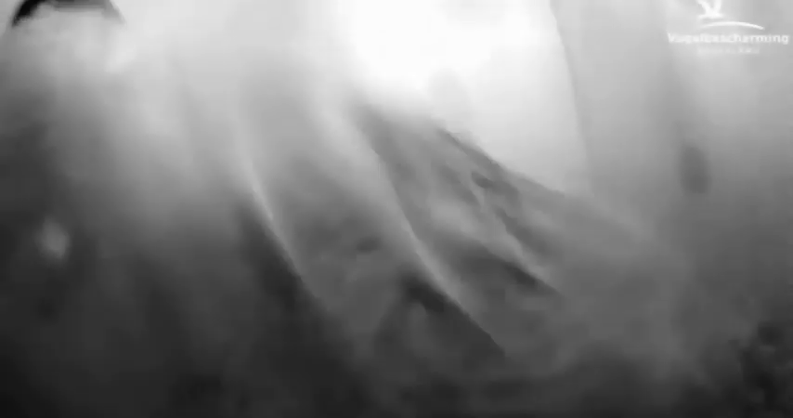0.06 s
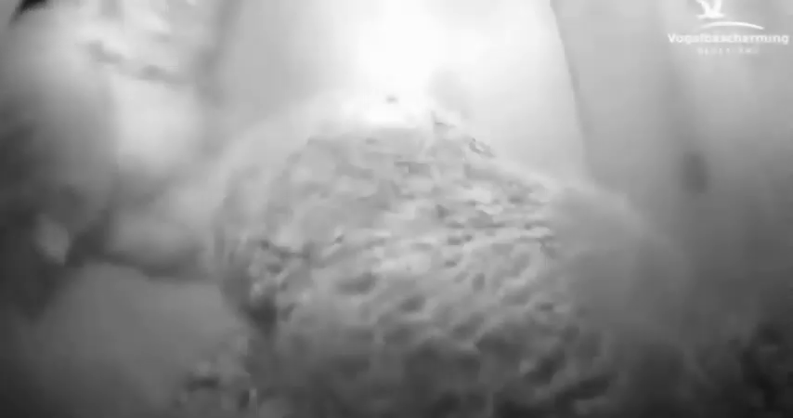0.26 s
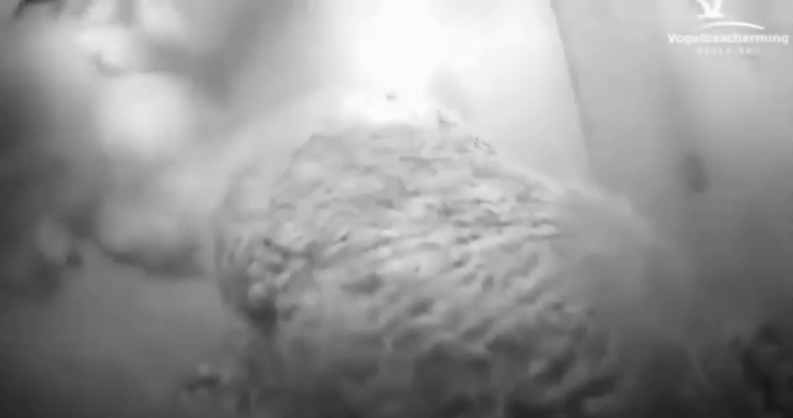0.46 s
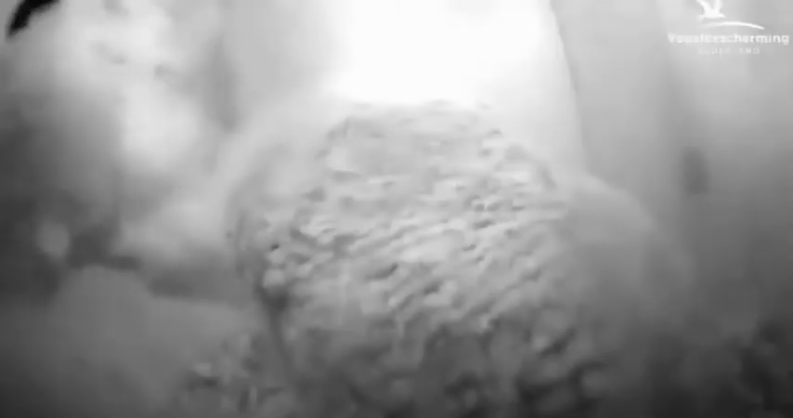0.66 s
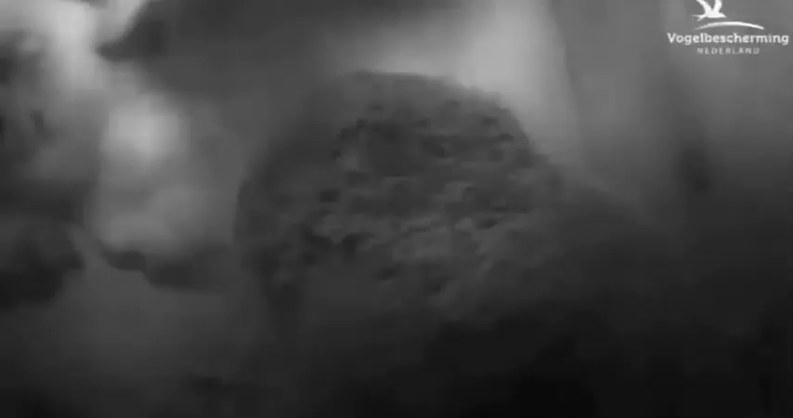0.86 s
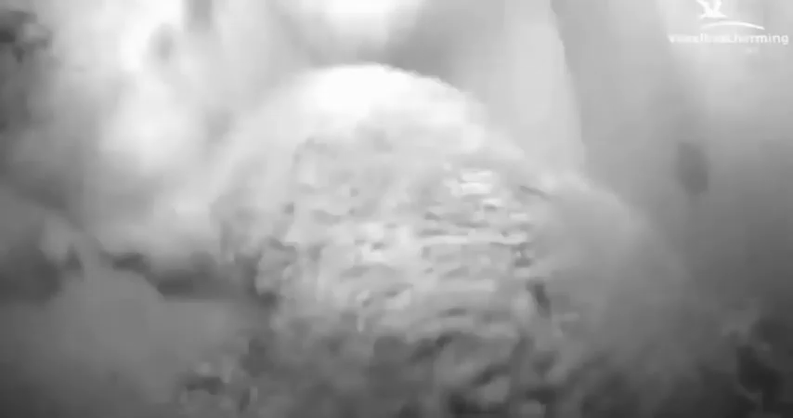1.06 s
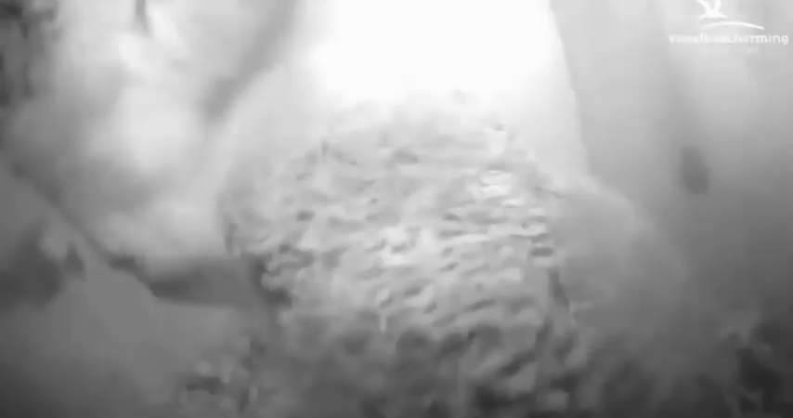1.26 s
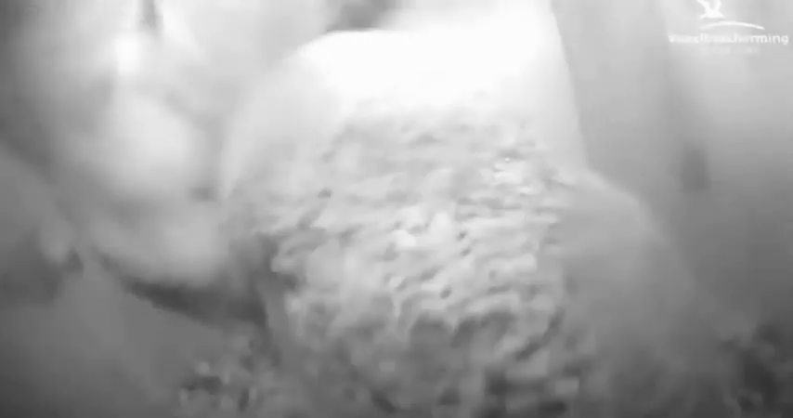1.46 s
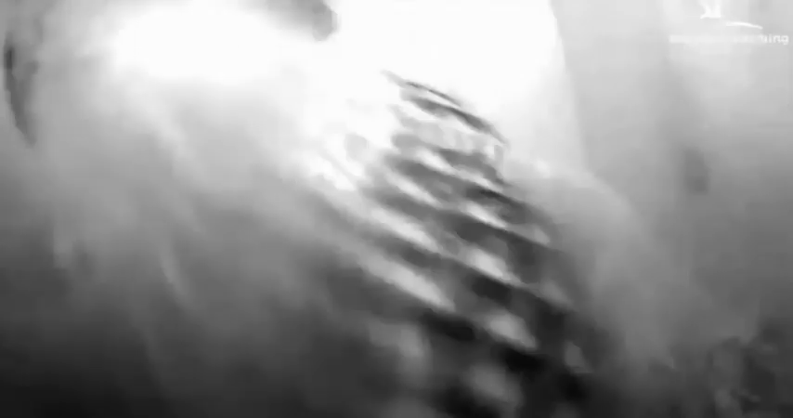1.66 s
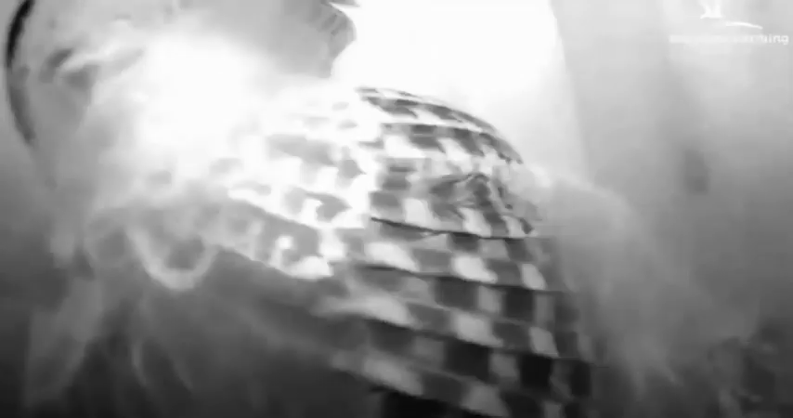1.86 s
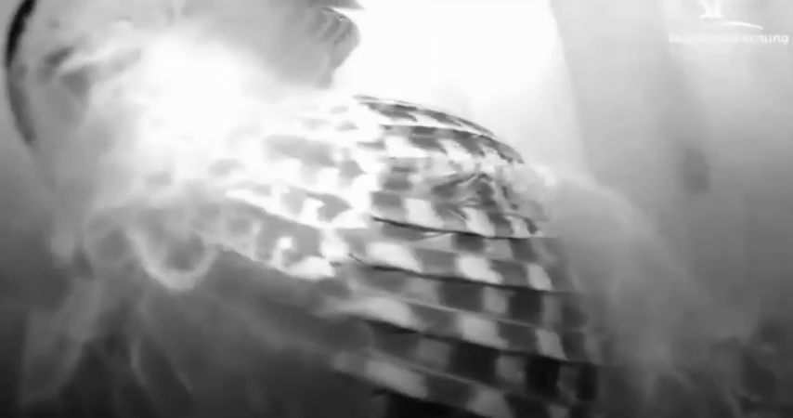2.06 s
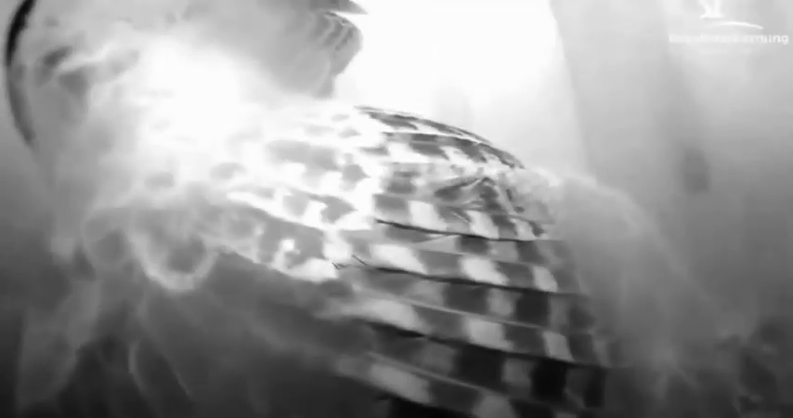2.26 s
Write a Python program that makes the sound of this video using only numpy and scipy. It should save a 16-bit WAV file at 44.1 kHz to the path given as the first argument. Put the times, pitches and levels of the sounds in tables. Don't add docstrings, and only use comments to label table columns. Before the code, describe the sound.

Very close, dull narrow-band microphone inside a small wooden box; a bird's body drags and slips against the wall twice with overloading thumps, panels rattling, feathers brushing and claws ticking, then only faint bumps over low hum.

```python
import sys
import numpy as np
from scipy import signal
from scipy.io import wavfile

SR = 44100
rng = np.random.default_rng(int(sys.argv[2]) if len(sys.argv) > 2 else 0)


def volts_from_db(level):
    exponent = np.asarray(level, float) / 20
    return 10 ** exponent


def unload_wav(signal):
    wavfile.write(
        sys.argv[1],
        SR,
        np.round(np.clip(np.atleast_2d(signal).T, -1, 1) * 32767).astype(np.int16),
    )


N = 101429


def rms_one(x):
    return x / np.sqrt(np.mean(x ** 2) + 1e-20)


def in_time(rows):
    seconds, *columns = np.transpose(rows)
    return [np.interp(np.arange(N) / SR, seconds, column) for column in columns]


def drift(rate):
    r = np.exp(-80 * np.pi * rate / SR)
    slow = signal.lfilter([1], [1, -2 * r, r * r], rng.standard_normal(N // 40 + 2002))[2000:]
    slow = rms_one(slow - slow.mean())
    return np.interp(np.arange(N) / 40, np.arange(len(slow)), slow)


def band(x, low_hz, high_hz):
    return signal.sosfilt(signal.butter(2, [low_hz, high_hz], "band", fs=SR, output="sos"), x)


def grains(per_s, spread_db):
    sizes = volts_from_db(spread_db * np.minimum(rng.exponential(1, N), 5)) * rng.choice([-1, 1], N)
    return sizes * (rng.random(N) < per_s / SR) + 1e-18


def above_floor(db, floor_db):
    return np.sqrt(np.maximum(volts_from_db(db) ** 2 - volts_from_db(floor_db) ** 2, 0))


# frequency in Hz, level in dB rms.
HUM_LINES = [(49.7, -61), (149.2, -76), (248.6, -89), (448, -92), (547, -92)]


def hum():
    t = np.arange(N) / SR
    out = np.zeros(N)
    for hz, db in HUM_LINES:
        level = np.sqrt(2) * volts_from_db(db + 0.9 * drift(2.4))
        out += level * np.sin(2 * np.pi * (hz * t + rng.random()))
    return out


# frequency in Hz, density in dB per Hz.
HISS_COLOUR = [(32, 19), (64, 15), (110, 5), (320, 3), (640, -4.5), (1100, -12), (2200, -9), (3600, -5)]
HISS_DB, HISS_FLICKER_DB, HISS_TOP_LOSS_DB = -76, 1.17, 6


def hiss():
    out = np.zeros(N)
    edges = 25 * 2 ** np.arange(0, 7.8, 1 / 3)
    white = rng.standard_normal((2, N))
    hz, db = np.transpose(HISS_COLOUR)
    for k, (low, high) in enumerate(zip(edges, edges[1:])):
        level_db = np.interp(np.log(low * high) / 2, np.log(hz), db)
        level_db = level_db - HISS_TOP_LOSS_DB * (low > 4000)
        out += volts_from_db(level_db + HISS_FLICKER_DB * drift(8)) * band(white[k % 2], low, high)
    return volts_from_db(HISS_DB) * rms_one(out)


# time in seconds, level in dB.
SWAY_LEVEL = [(0, -44.5), (.05, -56), (.15, -53.5), (.19, -46), (.23, -33.5), (.3, -36), (.38, -39),
              (.48, -56), (.58, -50), (.76, -46), (.82, -42), (.88, -52.5), (1.05, -55.5), (1.2, -64)]


def sway():
    level_db = in_time(SWAY_LEVEL)[0]
    return above_floor(level_db, -60) * rms_one(band(rng.standard_normal(N), 22, 62))


# start in seconds, level in dB, centre in Hz, width in Hz, rise in seconds.
WHEEZE_SHAPE = (2.07, -85, 3560, 260, .04)


def wheeze():
    start, db, hz, width_hz, rise = WHEEZE_SHAPE
    swell = np.clip((np.arange(N) / SR - start) / rise, 0, 1)
    air = band(rng.standard_normal(N), hz - width_hz / 2, hz + width_hz / 2)
    return volts_from_db(db + 2.5 * drift(10)) * swell * rms_one(air)


# time in seconds, bright level in dB, dull share in dB over bright.
BRUSH_LEVEL = [(0, -65, 10), (.04, -67, -4), (.06, -78, -3), (.24, -63, 1.5), (.3, -76.5, -3.5),
               (.66, -77, -0.5), (.7, -80, 13), (.725, -60.5, 5.5), (.765, -60, 3.5), (.782, -59, -14),
               (.83, -59, 3.5), (.9, -74.5, -2.5), (.93, -71, 5.5), (1.04, -72, 3.5), (1.08, -77.5, -1.5),
               (1.57, -77, -2.5), (1.62, -77, 6), (1.7, -76.5, -2)]
# time in seconds, level in dB, decay length in seconds.
CLAW_TICKS = [(.158, -66, .004), (.178, -66, .006), (.2035, -49.5, .004), (.211, -23, .002),
              (0.228, -47, 0.0028), (.2325, -47, .006), (.27, -66, 0.0093), (.75, -52, .006),
              (.758, -51, .006), (.874, -63, .002), (.881, -60, .003), (.718, -62, .004),
              (1.038, -70, .003), (1.012, -74.5, 0.0037), (1.259, -72, .015), (1.312, -75, 0.0046),
              (0.328, -62.5, 0.01), (0.412, -65, 0.014), (0.677, -65, .004), (.7938, -44, .0015),
              (.798, -30, .0015), (.8025, -34, .0015), (.8085, -42, .0015), (.811, -37, .0015),
              (.825, -49, .006), (.8465, -43, .002), (.928, -49, 0.0013), (.94, -65, 0.003),
              (.984, -61, 0.0017), (1.333, -61, .002), (1.388, -70.5, 0.0013), (1.526, -69, .004),
              (1.66, -66, .006), (1.87, -77, 0.012), (2.094, -80, .08)]
GRAINS_PER_S, GRAIN_SPREAD_DB, BRUSH_FLICKER_DB = 5000, 3.2, 2.6


def feathers_and_claws():
    t = np.arange(N) / SR
    bright_db, dull_db = in_time(BRUSH_LEVEL)
    bright = band(grains(GRAINS_PER_S, GRAIN_SPREAD_DB), 2500, 4300)
    bright = rms_one(band(bright, 2500, 4300))
    dull = band(grains(GRAINS_PER_S, GRAIN_SPREAD_DB), 350, 1700)
    dull = rms_one(band(dull, 300, 1300))
    ticks = np.zeros(N)
    for s, db, length in CLAW_TICKS:
        ticks += volts_from_db(db) * np.exp(-np.abs(t - s) / np.where(t < s, .001, length))
    bright_brush = volts_from_db(BRUSH_FLICKER_DB * drift(30)) * above_floor(bright_db, -77.5)
    dull_brush = volts_from_db(BRUSH_FLICKER_DB * drift(30)) * above_floor(bright_db + dull_db, -81)
    return (bright_brush + ticks) * bright + (dull_brush + volts_from_db(-5.5) * ticks) * dull


# time in seconds, level in dB, lift of small panels in dB per octave.
DRAG_LEVEL = [(0, -60, 3), (.06, -73, 6), (.185, -66, -4), (.225, -35, 3.5), (.285, -42, -5),
              (.385, -48, -5), (.45, -70, -1.5), (.66, -71, -7), (.76, -40, 1.5), (.85, -37, 3.5),
              (.885, -59, -2), (.955, -56, -3), (1.04, -62, -0.5), (1.1, -80, 4), (1.515, -85, 8.5),
              (1.55, -67, 4), (1.68, -65, 5), (1.72, -80, 4.5)]
# pitch in Hz, level in dB, 60 dB decay in seconds.
PANEL_RINGS = [(130, 3, .05), (185, 0.5, .06), (250, -4, .06), (305, -2.5, 0.15), (405, 2.5, .04),
               (525, -7, .03), (635, -7.5, .03), (850, -25, .02)]
SLIPS_PER_S, SLIP_SPREAD_DB = 900, 3


def drag():
    level_db, lift_db = in_time(DRAG_LEVEL)
    out = np.zeros(N)
    for hz, db, t60 in PANEL_RINGS:
        r, w = volts_from_db(-60 / (t60 * SR)), 2 * np.pi * hz / SR
        slips = grains(SLIPS_PER_S, SLIP_SPREAD_DB)
        ring = signal.lfilter([0, np.sin(w)], [1, -2 * r * np.cos(w), r * r], slips)
        ring = rms_one(band(ring, hz / 1.4, hz * 1.6))
        out += volts_from_db(db + lift_db * np.log2(hz / 250)) * ring
    soft = signal.butter(2, 600, fs=SR, output="sos")
    return above_floor(level_db, -72) * volts_from_db(-6) * signal.sosfilt(soft, out)


def damped_swings(rows):
    out = np.zeros(N)
    for s, db, hz, t60, rise in rows:
        t = np.maximum(np.arange(N) / SR - s, 0)
        decay = volts_from_db(db - 60 * np.minimum(t / t60, 4))
        contact = 1 - np.exp(-(t / rise) ** 2)
        out -= decay * contact * np.sin(2 * np.pi * hz * t)
    return out


# time in seconds, level in dB, signed pitch in Hz, 60 dB decay in seconds, rise in seconds.
PANEL_KNOCKS = [(.157, -44, 250, .02, .0004), (.2149, -14, -270, .03, .0006), (.41, -44, 330, .08, .002),
                (1.598, -64, 1170, .2, .01), (1.335, -56, 197.5, .08, .002),
                (.005, -50, 443, 0.052, 0.0012), (.304, -27, -220, .04, .002),
                (0.322, -24, -200, .04, .002), (.716, -45.5, 709, 0.034, .002),
                (.2232, -14, 215, .035, .001), (0.2335, -19, -120, .035, .001),
                (0.2616, -18, 220, 0.047, 0.0014), (.232, -38, 3600, .04, .003), (.866, -34, 75, .08, .003),
                (.3757, -35, -400, .018, .001), (.2712, -23, 200, .04, .001), (.8138, -15, 115, .02, .0012),
                (.418, -52, 800, .03, .002), (.42, -60, 1550, .04, .003), (.674, -43, 450, 0.045, .0008),
                (.755, -23, 335, .04, .002), (.7585, -32, 750, .015, .0008), (.75, -38, 1100, .02, .001),
                (.7942, -14, -90, .03, .002), (.821, -22, 294.5, 0.074, 0.00063),
                (.9515, -35, 197.5, 0.039, .002), (1.335, -55, 388, .05, .002),
                (1.525, -61, 1650, .025, .002), (1.526, -61, 900, .025, .002), (.676, -54, 980, .06, .003),
                (1.006, -46, 396, .03, .001), (1.5258, -32, -330, .016, .0014),
                (1.538, -50.5, -240, .12, .001), (1.6645, -45, 385.5, 0.019, 0.00088),
                (1.654, -57, 1175.5, 0.096, 0.0052), (2.165, -71.5, 1581.5, .12, .008)]


def knocks():
    return damped_swings(PANEL_KNOCKS)


# time in seconds, level in dB, signed pitch in Hz, 60 dB decay in seconds, rise in seconds.
BOX_THUDS = [
    (-.003, -37, -57, .09, .001),
    (.213, -17, -47.5, .12, 0.0033),
    (.409, -21, 61.5, .17, .006),
    (0.628, -35, -51, .2, .008),
    (1.001, -46, 162, .12, 0.0041),
    (1.33, -56, 99.5, 0.1, 0.011),
    (1.522, -46, -61, .15, .004),
]


def thuds():
    return damped_swings(BOX_THUDS)


# slip in seconds, level in dB, lean in seconds, rebound in seconds, snap in seconds.
LEAN_AND_SLIP = [
    (0.2126, -1.5, 0.0028, .0026, .004),
    (.8125, -1, .0021, .001, .00075),
]
# peak in seconds, level in dB, pitch in Hz, growth in seconds.
WALL_CHATTER = [
    (.2131, -4.5, 755, .002),
    (.81195, -9, 700, .0007),
    (.8118, -33, 3100, .0007),
    (.7991, -19, 1450, .0006),
    (.7943, -27, 850, .0007),
    (.2126, -22, 3470, .0012),
    (.2120, -33, 1690, .001),
    (.7985, -24, 3600, .0004),
    (.2118, -27, 2700, .001),
]
CHATTER_STOP_S, CHATTER_GLIDE_PER_S = 0.00049, 35


def shoves():
    t = np.arange(N) / SR
    out = np.zeros(N)
    for s, db, lean, rebound, snap in LEAN_AND_SLIP:
        pressure = np.exp(-np.abs(t - s) / np.where(t < s, lean, rebound))
        out += volts_from_db(db) * np.tanh((t - s) / snap) * pressure
    for s, db, hz, growth in WALL_CHATTER:
        u = t - s
        swell = np.exp(-(u / np.where(u < 0, growth, CHATTER_STOP_S)) ** 2 / 2)
        out -= volts_from_db(db) * swell * np.cos(2 * np.pi * hz * u * (1 + CHATTER_GLIDE_PER_S * u))
    return out


def scene():
    background = hum() + hiss() + sway() + wheeze()
    bird = feathers_and_claws() + drag() + knocks() + thuds() + shoves()
    return (background + bird)[None]


def top_cut(x):
    return signal.sosfilt(signal.butter(12, 15400, fs=SR, output="sos"), x)


RUN_IN = 400
DIP_HZ, DIP_WIDTH_HZ, DIP_DEPTH, LOW_CUT_HZ = 2020, 480, .42, 32
LINK_TOP_HZ, OVERLOAD, CHAIN_NOISE_DB = 4700, .455, -100


def record(dry):
    dry = np.pad(dry, ((0, 0), (RUN_IN, 0)), "reflect")
    dip = band(dry, DIP_HZ - DIP_WIDTH_HZ / 2, DIP_HZ + DIP_WIDTH_HZ / 2)
    low_cut = signal.butter(1, LOW_CUT_HZ, "high", fs=SR, output="sos")
    x = signal.sosfilt(low_cut, dry - DIP_DEPTH * dip)
    link = signal.cheby2(16, 70, LINK_TOP_HZ, fs=SR, output="sos")
    x = signal.sosfilt(link, x)[:, RUN_IN:]
    x = x / (1 + np.abs(x / OVERLOAD) ** 20) ** (1 / 20)
    mix = x + volts_from_db(CHAIN_NOISE_DB) * rng.standard_normal(x.shape)
    return top_cut(mix)


dry = scene()
out = record(dry)
unload_wav(out)
```